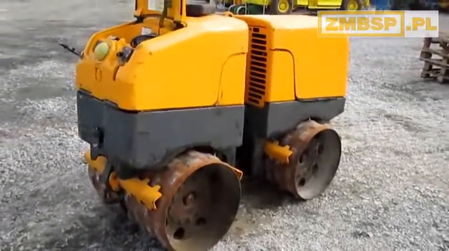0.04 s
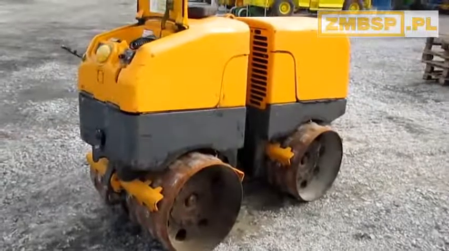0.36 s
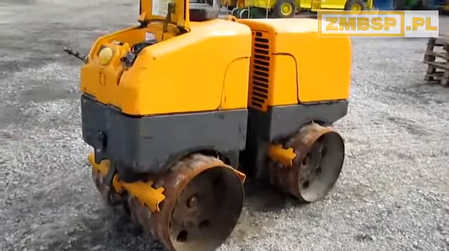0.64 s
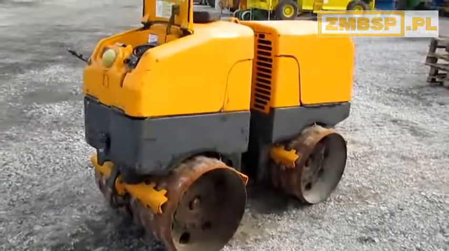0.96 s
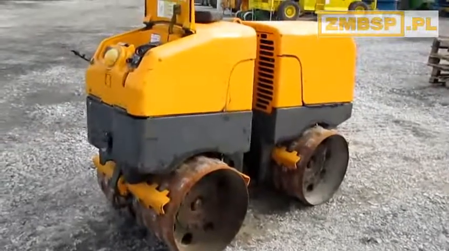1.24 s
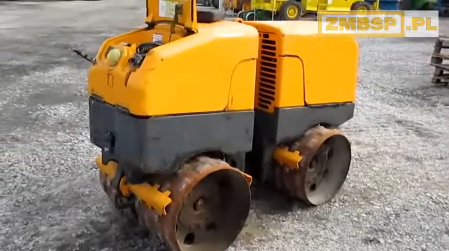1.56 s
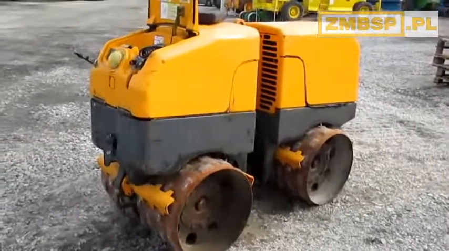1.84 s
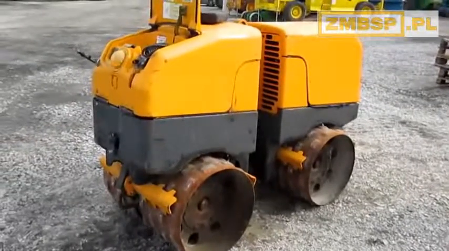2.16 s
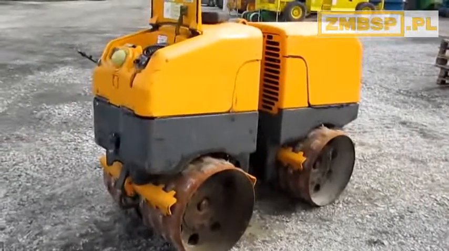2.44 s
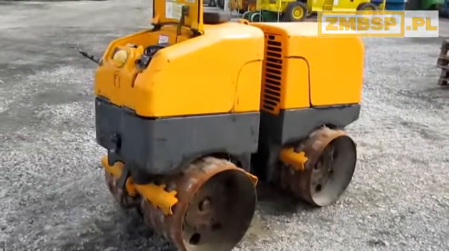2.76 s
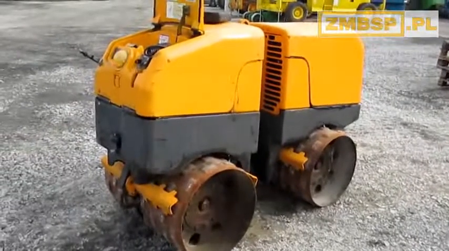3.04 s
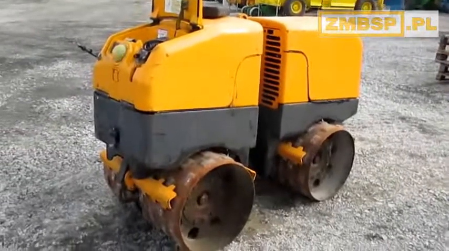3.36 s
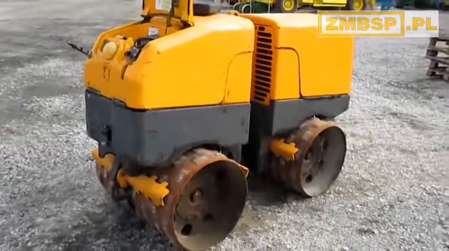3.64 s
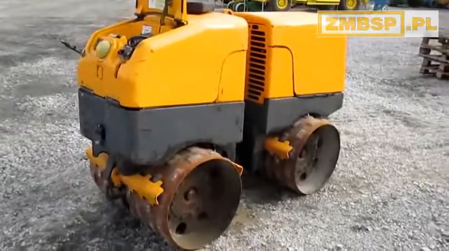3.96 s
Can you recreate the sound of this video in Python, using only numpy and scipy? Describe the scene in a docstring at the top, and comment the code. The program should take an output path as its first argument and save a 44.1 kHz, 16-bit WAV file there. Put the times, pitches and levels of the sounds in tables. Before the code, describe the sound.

A trench roller's diesel engine runs close by in the open air with a steady low drone. From the start, its heavy frame knocks and rumbles, the sheet-metal hood clatters about a dozen times a second, and a loose part ticks. Just after 2 seconds the engine speeds up slightly. The rattle fades from about 2.8 seconds, leaving mostly the smoother, quieter drone from 3.5 to 4 seconds.

```python
"""Three-cylinder diesel of a trench roller, running near 65 firings/s on a gravel yard.
Firings make the exhaust drone and pulse the block noise. The machine shakes: metal contacts
knock the heavy frame and clatter the sheet-metal hood about a dozen times a second; a loose
part ticks. After 2 s the engine picks up a little and the rattle dies away, leaving the drone."""
import sys
import numpy as np
from scipy import signal
from scipy.fft import rfft, irfft
from scipy.io import wavfile
from scipy.ndimage import uniform_filter1d

SR = 44100
rng = np.random.default_rng(int(sys.argv[2]) if len(sys.argv) > 2 else 0)


def generate_wav(sig):
    """Save sig (samples, or channels by samples) to the path in sys.argv[1] as 16-bit PCM at SR."""
    pcm = np.round(np.clip(np.atleast_2d(sig).T, -1, 1) * 32767).astype(np.int16)
    wavfile.write(sys.argv[1], SR, pcm)


N = 176400
TIME_S = np.arange(N) / SR
CYLINDERS = 3

# shaking strength (time [s], level [dB])
SHAKE_DB = [(0, 0.5), (.4, 4), (.9, 0), (1.45, 3), (1.85, 1), (2.2, 0.5), (2.35, -5.5), (2.75, -1.5),
            (3.0, -13), (3.4, -19), (4, -37)]
# loose-part ticks (time [s], level [dB])
TICK_EVENTS = [(0.0505, -25), (0.491, -27), (0.573, -24), (0.598, -25.5), (0.645, -29.5), (0.8085, -27),
               (0.833, -26), (0.8565, -28), (0.8797, -25.5), (1.1185, -31), (1.3643, -25), (1.3775, -25),
               (1.4015, -31), (1.4537, -23), (1.4787, -23), (1.7105, -32), (1.7628, -30), (1.7873, -31),
               (2.0433, -27), (2.1805, -31), (2.2055, -30), (2.2323, -27), (2.4087, -25), (2.4333, -30.5),
               (2.659, -27), (2.7287, -28.5), (2.8837, -35), (2.9317, -26), (3.205, -31), (3.339, -36),
               (3.3807, -35.5), (3.8157, -32.5)]
# tick spectrum (frequency [Hz], density [dB])
TICK_SPECTRUM = [(2500, -14.5), (4800, -1), (5600, 3.5), (6400, 6), (7400, -5.5), (9000, -13.5),
                 (10000, -32)]

# hood clatters (time [s], treble [dB], midrange [dB], length [s])
HOOD_CLATTERS = [(0.043, -26.5, -28, 0.041), (0.122, -30, -23.5, 0.046), (0.17, -26.5, -33, 0.03),
                 (0.224, -26.5, -22.5, 0.053), (0.32, -29, -28, 0.05), (0.389, -26, -20.5, 0.071),
                 (0.516, -25.5, -37, 0.067), (0.612, -29, -23.5, 0.077), (0.672, -24, -21, 0.058),
                 (0.731, -30, -21, 0.056), (0.826, -28.5, -23, 0.077), (0.891, -29, -16.5, 0.015),
                 (0.981, -28.5, -22, 0.051), (1.05, -24.5, -23, 0.043), (1.151, -29.5, -24.5, 0.043),
                 (1.217, -26, -25, 0.042), (1.264, -32, -22, 0.026), (1.369, -25.5, -20.5, 0.049),
                 (1.414, -27, -24, 0.041), (1.461, -26.5, -20.5, 0.059), (1.575, -26.5, -22, 0.033),
                 (1.662, -26, -45, 0.028), (1.727, -28, -27, 0.033), (1.79, -32, -41, 0.033),
                 (1.86, -30, -30, 0.068), (2.017, -25.5, -21, 0.052), (2.099, -29.5, -24, 0.023),
                 (2.145, -28, -17, 0.075), (2.231, -24, -18.5, 0.049), (2.333, -27, -22, 0.021),
                 (2.372, -32.5, -26.5, 0.022), (2.4, -43, -28.5, 0.019), (2.46, -34, -25.5, 0.034),
                 (2.53, -40, -29, 0.024), (2.598, -32.5, -27, 0.021), (2.66, -41, -31.5, 0.023),
                 (2.731, -31.5, -30, 0.028), (2.77, -31, -24, 0.024), (2.866, -32.5, -26, 0.029),
                 (2.921, -34.5, -26.5, 0.036), (2.967, -38, -28.5, 0.02), (3.024, -37.5, -30, 0.022),
                 (3.083, -36.5, -28, 0.017), (3.146, -36.5, -30.5, 0.024), (3.205, -43, -35, 0.025),
                 (3.265, -41, -39, 0.029), (3.388, -42, -35, 0.014)]
# hood panel modes (frequency [Hz], level [dB], T60 [s])
PANEL_MODES = [(1037, -4, 0.007), (1192, -5.5, 0.15), (1283.5, -1.5, 0.068), (1323.4, -4.5, 0.085),
               (1575, -10.5, 0.16), (1632.6, -2, 0.052), (2165, -4.5, 0.021), (2294, -19, 0.31),
               (2510, -9.5, 0.17), (2610, 2.5, 0.1), (2775, -2, 0.032), (2830, -9, 0.071)]
# grille slat modes (frequency [Hz], level [dB])
SLAT_MODES = [(3015, -60.5), (3520, -53.5), (3736, -56.5), (3941, -57), (4194, -62), (4463, -62.5),
              (4737, -61), (5254, -60.5), (6342, -66), (6891, -67.5)]
# contact crash on the hood (frequency [Hz], density [dB])
CRASH_SPECTRUM = [(700, -20.5), (1200, 10), (1450, -15), (1800, 2.5), (2150, 9.5), (2420, -1.5), (2750, 4),
                  (3100, 1.5), (3600, 1.5), (4400, -4.5), (5300, -7.5), (6500, -14.5), (7500, -18),
                  (8800, -25), (10000, -48.5)]

# frame knocks (time [s], ring [dB], thud [dB], length [s])
FRAME_KNOCKS = [(0.024, -11, -38, 0.0065), (0.056, -20, -42, 0.015), (0.13, -17, -24.5, 0.038),
                (0.243, -23, -26, 0.051), (0.352, -11, -38, 0.016), (0.387, -16, -32, 0.025),
                (0.466, -14.5, -32, 0.047), (0.527, -14, -21, 0.016), (0.619, -12, -30, 0.023),
                (0.707, -18, -25, 0.037), (0.807, -15, -41, 0.027), (0.882, -32, -23.5, 0.017),
                (0.969, -12.5, -17, 0.024), (1.057, -13.5, -24, 0.018), (1.121, -16, -18.5, 0.03),
                (1.22, -12.5, -36, 0.034), (1.298, -18, -43, 0.013), (1.352, -9.5, -21, 0.018),
                (1.508, -11.5, -19.5, 0.018), (1.59, -15, -27, 0.041), (1.665, -14, -33, 0.018),
                (1.734, -14.5, -27, 0.022), (1.824, -17.5, -34, 0.041), (1.993, -13, -24, 0.064),
                (2.133, -12.5, -22.5, 0.017), (2.183, -13.5, -40, 0.054), (2.323, -15, -21, 0.018),
                (2.448, -13.5, -25.5, 0.015), (2.5, -22, -28, 0.034), (2.557, -15, -35, 0.0093),
                (2.627, -15, -34, 0.023), (2.672, -19, -41, 0.016), (2.751, -15.5, -21.5, 0.015),
                (2.85, -24.5, -45, 0.023), (2.921, -22.5, -28, 0.026), (2.965, -28, -34, 0.015),
                (3.02, -25, -51, 0.021), (3.085, -38, -29.5, 0.019), (3.138, -25, -30, 0.011),
                (3.267, -32, -29, 0.026), (3.332, -41, -32.5, 0.015), (3.657, -31, -39, 0.025)]
# frame modes (frequency [Hz], level [dB], T60 [s])
RING_MODES = [(630, -12.5, 0.029), (692, -5, 0.074), (754.6, -2, 0.08), (786, 2.5, 0.13),
              (809.7, -4.5, 0.14), (889, -4, 0.042), (984, -10, 0.017)]
# frame thud (frequency [Hz], density [dB])
THUD_SPECTRUM = [(120, -38.5), (260, -11), (335, 5.5), (400, -2), (448, 12.5), (515, 1), (600, 5),
                 (720, -7), (1000, -8), (1150, -5), (1400, -61)]
# shaking rumble (frequency [Hz], density [dB])
RUMBLE_SPECTRUM = [(18, -35), (28, -17.5), (38, 0.5), (48, -9), (62, 0.5), (90, -11.5), (150, 1.5),
                   (240, 3), (300, -3), (400, -3.5), (800, -61)]
# rumble envelope (time [s], level [dB])
RUMBLE_DB = [(0, -30), (.7, -23.5), (1.9, -25), (2.6, -26.5), (3.0, -36), (3.5, -55)]

# engine block noise (frequency [Hz], density [dB])
BLOCK_SPECTRUM = [(24, -24), (38, -5), (55, -7), (110, -0.5), (200, -1.5), (310, 0), (400, -5.5), (480, -3),
                  (660, -1.5), (780, -2.5), (920, -10), (1100, -11.5), (1450, -16), (1900, -18.5),
                  (2700, -22.5), (3500, -28), (4600, -30), (6300, -31.5), (8000, -42), (9200, -50),
                  (10000, -68.5)]
# block envelope (time [s], level [dB])
BLOCK_DB = [(0, -21.5), (2.8, -26.5), (3.3, -26.5), (3.6, -28), (4, -25)]
# engine firing (time [s], rate [Hz])
FIRING_HZ = [(0, 61.8), (.2, 64.57), (.45, 63.2), (.7, 63.4), (1.8, 63.45), (2.08, 64.28), (2.24, 68.07),
             (2.35, 67.15), (2.47, 65.8), (2.7, 65.94), (2.88, 66.6), (3.2, 65.7), (4, 65.65)]
# exhaust partials (order [x four-stroke cycle rate], level [dB]); multiples of 3 are firing harmonics
EXHAUST_PARTIALS = [(3, -13), (6, -0.5), (7, -25.5), (8, -31.5), (9, -3.5), (10, -26.5), (12, -18),
                    (14, -22.5)]
# exhaust envelope (time [s], level [dB])
EXHAUST_DB = [(0, -26.5), (.5, -24.5), (1.05, -25.5), (1.76, -27), (1.88, -26), (2.3, -26), (2.55, -29.5),
              (2.75, -24), (3.05, -28.5), (3.3, -23.5), (3.55, -24), (3.8, -21.5), (4, -22.5)]


def from_db(db):
    """dB to amplitude."""
    return 10 ** (np.asarray(db) / 20)


def unit_rms(x):
    """Scale to RMS 1."""
    return x / np.sqrt(np.mean(x ** 2) + 1e-20)


def curve(rows):
    """Linear interpolation of (time [s], value) rows."""
    return np.interp(TIME_S, *np.transpose(rows))


def noise():
    """White noise."""
    return rng.standard_normal(N)


def drift(corner_hz):
    """Slow random signal, RMS 1."""
    bins_hz = np.arange(N // 2 + 1) * SR / N
    return unit_rms(irfft(rfft(noise()) / (1 + (bins_hz / corner_hz) ** 2) ** 2, N))


def butter(x, edges_hz, kind):
    """Butterworth filter, order 2."""
    return signal.sosfilt(signal.butter(2, edges_hz, kind, fs=SR, output="sos"), x)


def colour(x, spectrum):
    """Minimum-phase filter, unit power gain."""
    hz, db = np.transpose(spectrum)
    bins_hz = np.arange(N // 2 + 1) * SR / N
    gain = unit_rms(from_db(np.interp(np.log(bins_hz + 1), np.log(hz), db)))
    cepstrum = irfft(np.log(gain), N)[:N // 2]
    cepstrum[1:] *= 2
    impulse = irfft(np.exp(rfft(cepstrum, N)), N)[:N // 8]
    return signal.fftconvolve(x, impulse)[:N]


def levelled(x, window_s=0.047):
    """Hold short-term RMS at 1."""
    return x / np.sqrt(np.abs(uniform_filter1d(x ** 2, int(window_s * SR))) + 1e-14)


def contacts(rate_hz=900, spread_db=2, hiss_gain=0.44):
    """Dense metal-on-metal clicks of uneven size, plus scraping hiss."""
    sizes = from_db(spread_db * np.minimum(rng.exponential(1, N), 4)) * rng.choice([-1, 1], N)
    clicks = unit_rms(sizes * (rng.random(N) < rate_hz / SR))
    return unit_rms(clicks + hiss_gain * noise())


def ringing(modes):
    """Contact-driven resonators at constant level."""
    ring = 0
    for hz, db, t60_s in modes:
        radius, angle_rad = from_db(-60 / (t60_s * SR)), 2 * np.pi * hz / SR
        mode = signal.lfilter([1, -1], [1, -2 * radius * np.cos(angle_rad), radius ** 2], contacts())
        ring += from_db(db) * unit_rms(mode)
    return levelled(butter(ring, [modes[0][0] * 0.66, modes[-1][0] * 1.43], "band"))


def rattle_gain(times_s, levels_db, lengths_s, bed_db, rise, fall):
    """Bursts over a bed that follows the shaking; rise and fall are fractions of burst length."""
    power = from_db(bed_db + curve(SHAKE_DB)) ** 2
    for peak_s, db, length_s in zip(times_s, levels_db, lengths_s):
        near = np.abs(TIME_S - peak_s) < 2 * length_s
        age = (TIME_S[near] - peak_s) / length_s
        burst = np.exp(-np.where(age < 0, (age / rise) ** 2, np.abs(age / fall) ** 1.8))
        power[near] += from_db(db) ** 2 * burst
    return np.sqrt(power)


def loose_part(t60_s=0.0062, repeat_s=0.0017):
    """Small loose part: each tick is a bright double click."""
    envelope = 0
    for start_s, db in TICK_EVENTS:
        for lag_s, trim_db in [(0, -4), (repeat_s, -5)]:
            age_s = TIME_S - start_s - lag_s
            envelope += from_db(db + trim_db - 60 * np.abs(age_s) / t60_s) * (age_s >= 0)
    return colour(rng.choice([-1, 1], N) * envelope, TICK_SPECTRUM)


def hood(split_hz=1900, slat_t60_s=0.072, notch_hz=1451, notch_width_hz=210):
    """Contact bursts crash on sheet metal and ring panel and grille; a notch lies between panel modes."""
    times_s, treble_db, mid_db, lengths_s = np.transpose(HOOD_CLATTERS)

    def bursts(levels_db, bed_db):
        return rattle_gain(times_s, levels_db, lengths_s, bed_db, rise=0.2, fall=0.57)

    mid = ringing([m for m in PANEL_MODES if m[0] < split_hz]) * bursts(mid_db + 2.5, bed_db=-25)
    treble = ringing([m for m in PANEL_MODES if m[0] >= split_hz]) * bursts(treble_db - 0.5, bed_db=-37)
    slats = ringing([(hz, db, slat_t60_s) for hz, db in SLAT_MODES])
    grille = slats * bursts(treble_db - 9.5, bed_db=-48.5)
    crash = colour(contacts(), CRASH_SPECTRUM) * bursts(treble_db - 5, bed_db=-38)
    notch = signal.iirnotch(notch_hz, notch_hz / notch_width_hz, fs=SR)
    return signal.lfilter(*notch, mid + treble + grille + crash)


def frame():
    """Heavy shaking frame: knocks ring and thud over a low rumble."""
    times_s, ring_db, thud_db, lengths_s = np.transpose(FRAME_KNOCKS)

    def knocks(levels_db, bed_db):
        return rattle_gain(times_s, levels_db, lengths_s, bed_db, rise=0.41, fall=0.76)

    ring = ringing(RING_MODES) * knocks(ring_db - 1.5, bed_db=-23)
    thud = levelled(colour(contacts(), THUD_SPECTRUM)) * knocks(thud_db + 2.5, bed_db=-25)
    rumble = from_db(curve(RUMBLE_DB)) * colour(contacts(), RUMBLE_SPECTRUM)
    return ring + thud + rumble


def engine_block(cycle_rad, pulse_db=2, split_hz=2030):
    """Combustion noise throbs once per firing; treble ticks twice per crank turn."""
    crank_rad = 2 * cycle_rad
    throb = noise() * from_db(-pulse_db * np.cos(CYLINDERS * cycle_rad))
    ticking_db = pulse_db * (np.cos(2 * crank_rad) + 0.4 * np.cos(crank_rad)) - 3.5
    ticking = (noise() + 0.5 * contacts()) * from_db(ticking_db)
    excitation = butter(throb, split_hz, "low") + butter(ticking, split_hz, "high")
    return from_db(curve(BLOCK_DB)) * unit_rms(colour(excitation, BLOCK_SPECTRUM))


def exhaust(cycle_hz, cycle_rad, muffler_hz=198, half_width_hz=8.4, muffler_db=2.5):
    """Firing harmonics, weak partials from unequal cylinders, muffler resonance; shaking adds waver."""
    waver_db = 0.3 + 0.5 * from_db(curve(SHAKE_DB))
    drone = 0
    for order, db in EXHAUST_PARTIALS:
        detuning = (order * cycle_hz - muffler_hz) / half_width_hz
        lift_db = muffler_db / (1 + detuning ** 2)
        gain = from_db(db + lift_db + waver_db * drift(corner_hz=13))
        drone += gain * np.cos(order * cycle_rad - np.arctan(detuning))
    return np.sqrt(2) * from_db(curve(EXHAUST_DB)) * drone


def scene():
    """Engine plus rattling bodywork; open air, mono."""
    cycle_hz = curve(FIRING_HZ) / CYLINDERS
    cycle_rad = 2 * np.pi * np.cumsum(cycle_hz) / SR
    engine = exhaust(cycle_hz, cycle_rad) + engine_block(cycle_rad)
    return (engine + frame() + hood() + loose_part())[None]


def record(dry):
    """Soft clip, then steep low-pass."""
    cutoff_hz = 9900
    return signal.sosfilt(signal.ellip(12, 0.2, 90, cutoff_hz, fs=SR, output="sos"), np.tanh(dry))


dry = scene()
out = record(dry)
generate_wav(out)
```